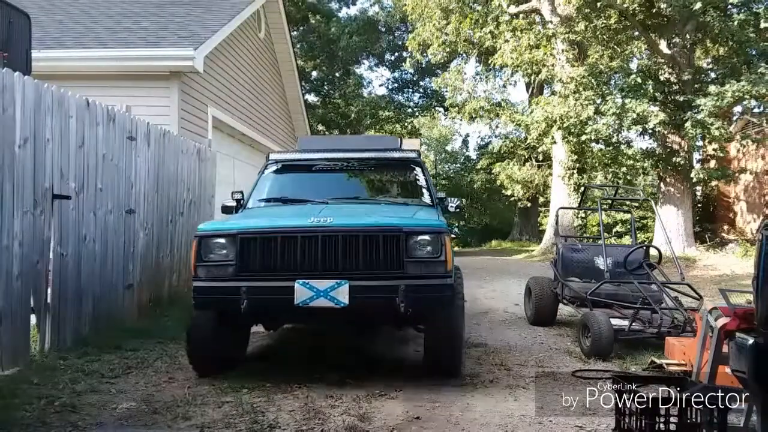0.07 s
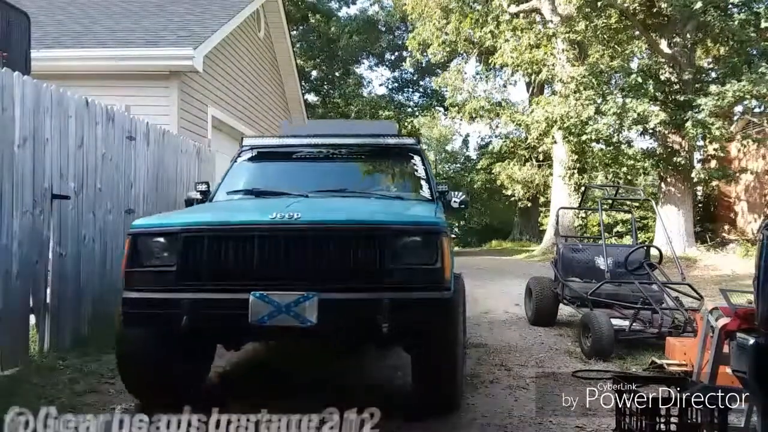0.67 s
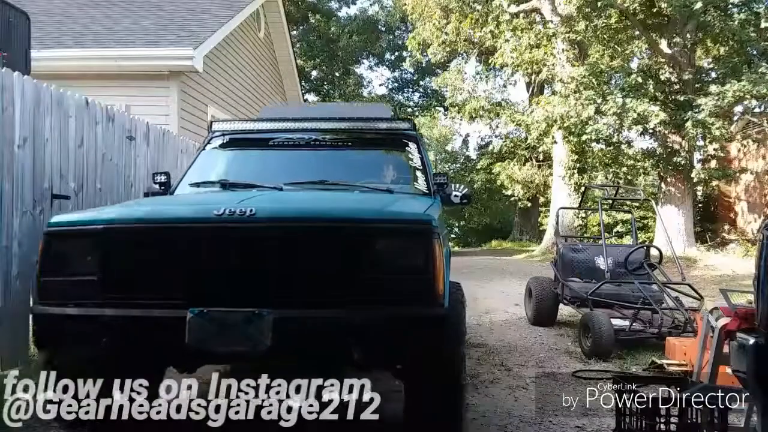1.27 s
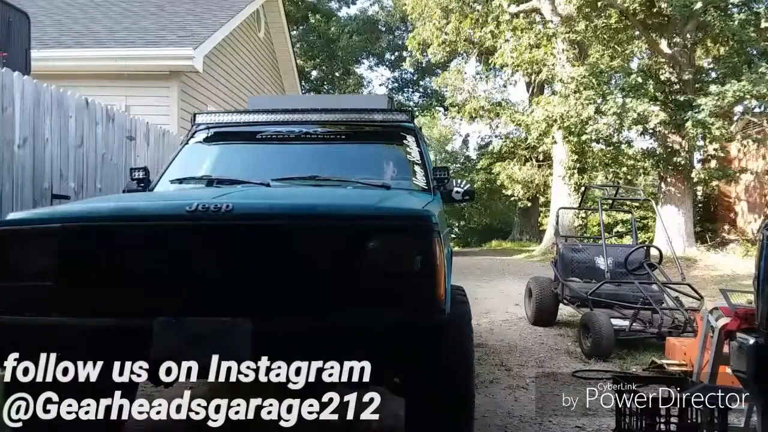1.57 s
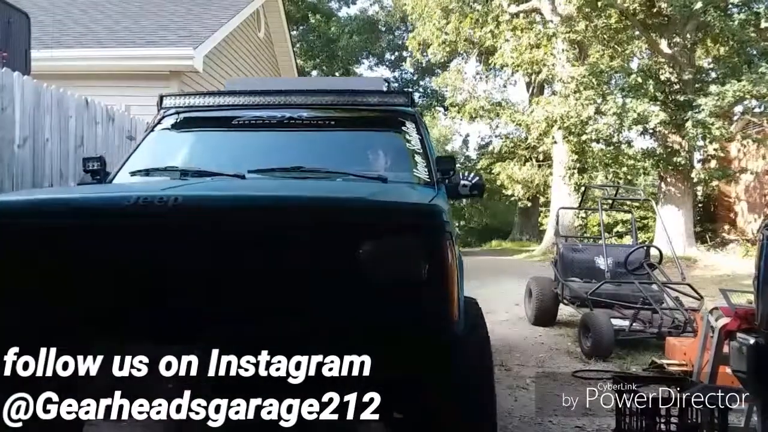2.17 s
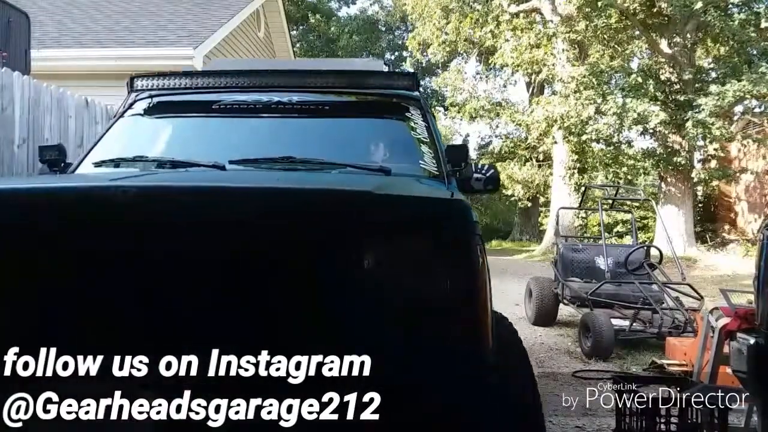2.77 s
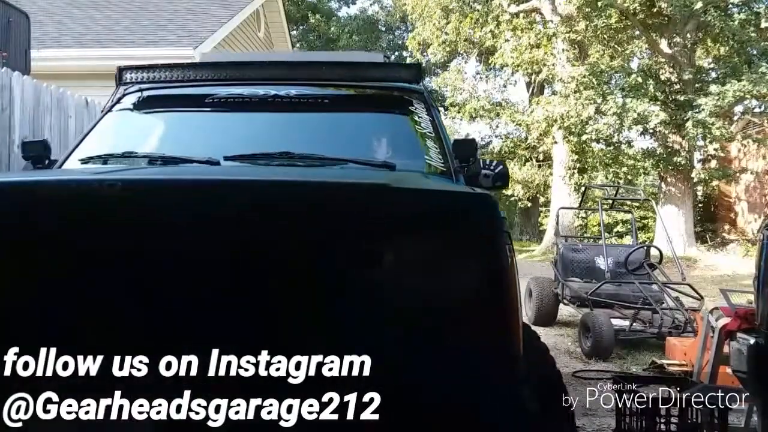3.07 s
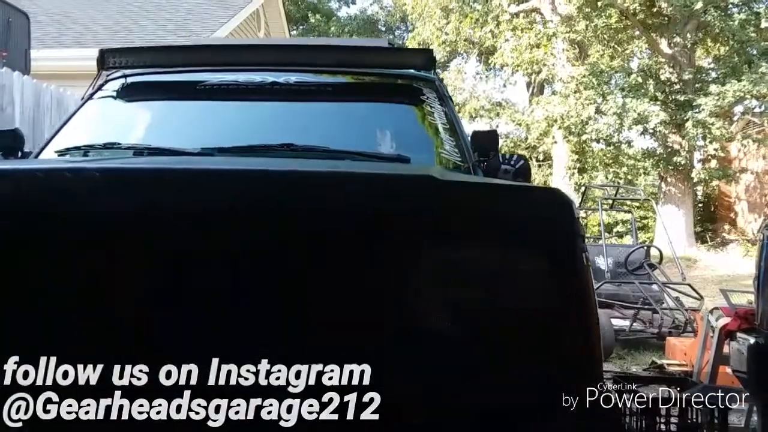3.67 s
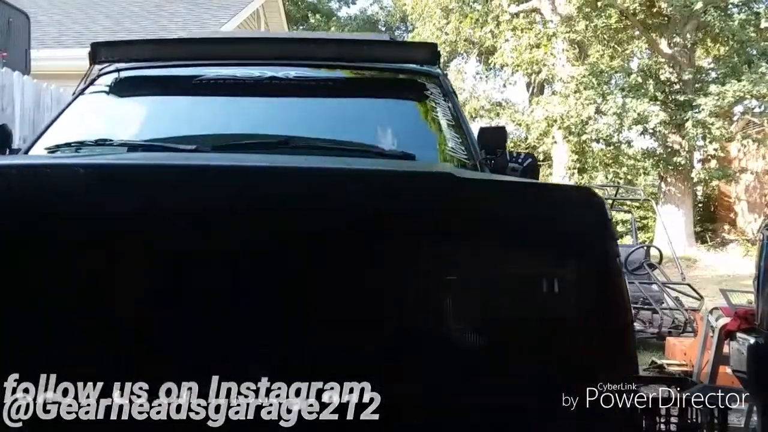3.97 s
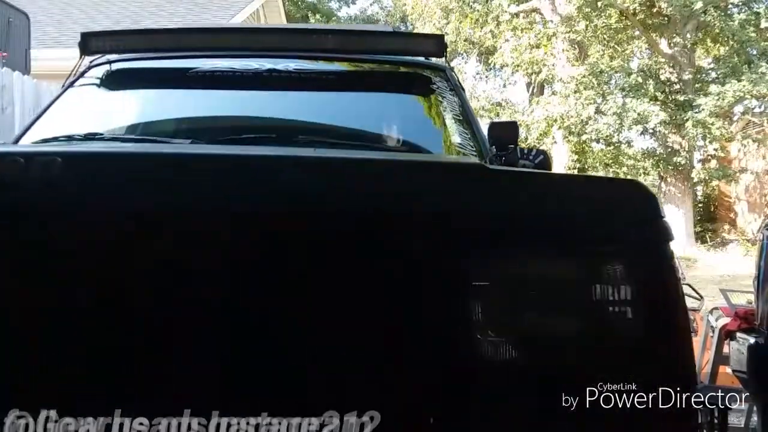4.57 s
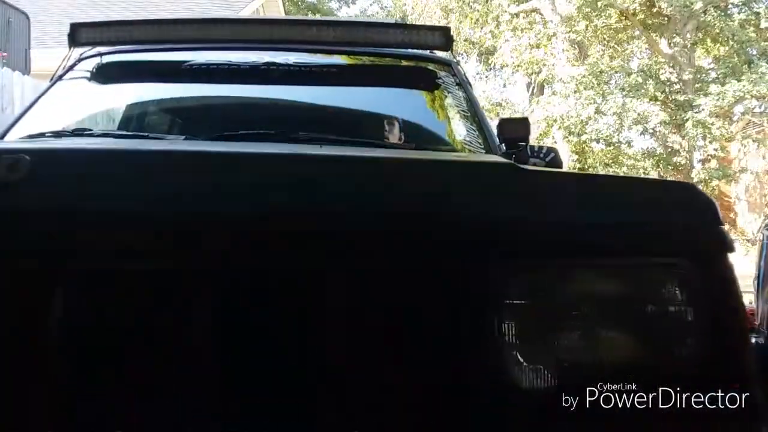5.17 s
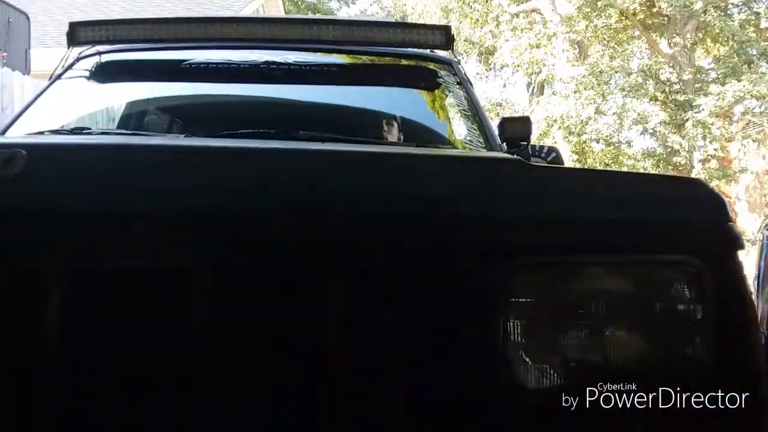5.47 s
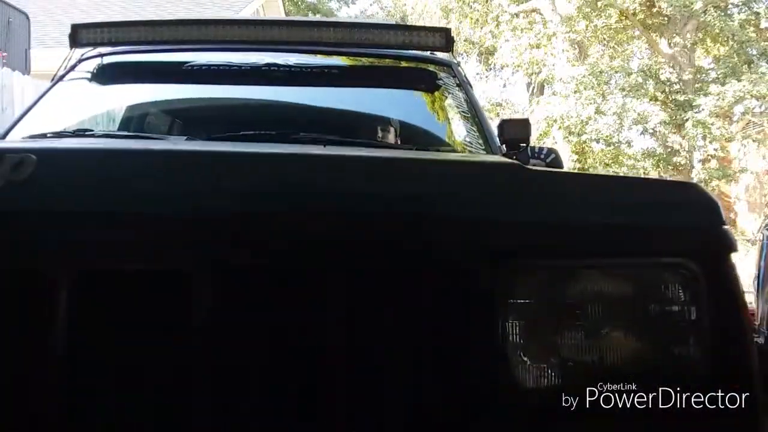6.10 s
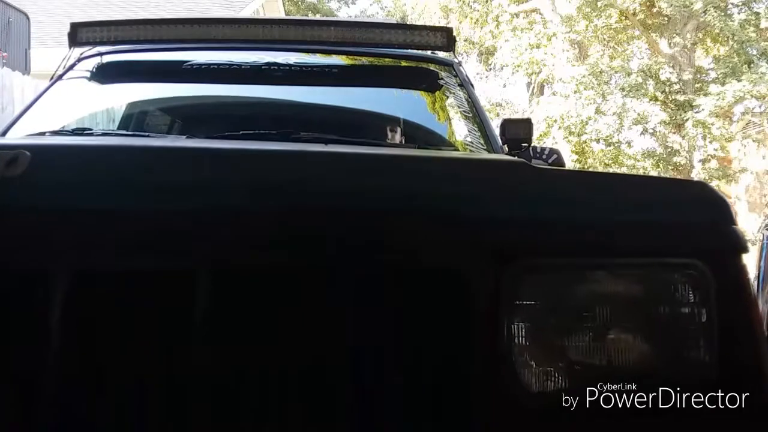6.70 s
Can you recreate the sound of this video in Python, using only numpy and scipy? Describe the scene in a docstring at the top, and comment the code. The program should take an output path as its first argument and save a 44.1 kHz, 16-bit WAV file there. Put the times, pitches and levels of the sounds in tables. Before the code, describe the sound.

An off-road car creeps up a gravel driveway toward the microphone, its engine throbbing low and uneven and growing steadily louder. Gravel crunches under the rumbling tyres and a few stones snap sharply. As it nears, valve ticking and fan rush come forward and the brakes rub grittily. It halts very close with two clunks, and the idle rises and keeps running.

```python
"""Off-road car on a gravel driveway.

A straight-six creeps up from a distance and halts just in front of a stereo microphone.
Uneven cylinders ring the exhaust; valves tick and the fan rushes behind the grille.
Gravel crunches and stones snap under the tyres, then the brakes rub as the car slows.
Close up, near the end, the drivetrain clunks and the idle rises as the load comes off."""
import sys
import numpy as np
from scipy import signal
from scipy.fft import rfft, irfft
from scipy.io import wavfile
from scipy.ndimage import uniform_filter1d

SR = 44100
rng = np.random.default_rng(int(sys.argv[2]) if len(sys.argv) > 2 else 0)


def dump(signal):
    """Clip the signal to [-1, 1] and save it as 16-bit WAV at the path in sys.argv[1]."""
    limited = np.clip(np.atleast_2d(signal).T, -1, 1)
    pcm = np.round(limited * 32767).astype(np.int16)
    wavfile.write(sys.argv[1], SR, pcm)


N = 301644
TIME = np.arange(N) / SR

# the six cylinders in firing order: strength/dB, change when far off/dB, lag/firing intervals
CYLINDER_PULSES = [(1.35, -3, .1), (2.07, -1, .084), (-2, -3, 0.054), (1.08, 3.5, .094), (-0.8, -3.5, 0.08),
                   (-.5, 3.5, 0.067)]


def undb(db):
    """Decibels to gain."""
    return 10 ** (np.asarray(db) / 20)


def unit(x):
    """Scale to rms 1."""
    return x / np.sqrt(np.mean(x ** 2))


def swell(s, width):
    """A smooth rise and fall around time s, 1 at the top."""
    return np.exp(-((TIME - s) / width) ** 2)


def ramp(start, length):
    """From 0 to 1 within a given length."""
    return np.clip((TIME - start) / length, 0, 1)


def walk(rate):
    """A smooth random drift with a spread near 1."""
    k = int(SR / rate)
    steps = np.repeat(rng.standard_normal(N // k + 1), k)
    return 1.27 * uniform_filter1d(uniform_filter1d(steps, k), k)[:N]


def colour(x, points):
    """Filter x by a curve of (f/Hz, level/dB) points; rms 1."""
    hz, db = np.transpose(points)
    f = np.maximum(np.arange(N // 2 + 1) * SR / N, 1)
    gain = undb(np.interp(np.log(f), np.log(hz), db)) * np.minimum(f / hz[0], 1) ** 2
    return unit(irfft(rfft(x) * gain, N))


def resonate(x, hz, width):
    """A resonance applied twice: steep skirts, gain 1 at the centre."""
    b, a = signal.iirpeak(hz, hz / width, fs=SR)
    return signal.lfilter(b, a, signal.lfilter(b, a, x))


def pulses(phase, marks, sizes):
    """One pulse wherever the phase passes a mark."""
    at = np.searchsorted(phase, marks)
    return np.bincount(np.minimum(at, N), sizes, N + 1)[:N]


def spread(pair, likeness, pan_db=0):
    """Mix two unrelated sounds into a stereo image; positive pan is to the left."""
    sides = np.array([[1], [-1]])
    mid, side = np.sqrt(1 + likeness) * pair[0], np.sqrt(1 - likeness) * pair[1]
    return (mid + side * sides) / np.sqrt(2) * undb(sides * pan_db / 2)


def burst(s, t60, tail_db, tail_t60):
    """A crack dying fast, followed by its scatter off fence and garage."""
    age = np.maximum(TIME - s, 0)
    span = (TIME >= s) & (age < .6)
    decay = undb(-60 * age[span] / t60) + undb(tail_db - 60 * age[span] / tail_t60)
    out = np.zeros((2, N))
    out[:, span] = rng.standard_normal((2, span.sum())) * decay
    return out


def rumble(far):
    """Low shudder of the body and the air it stirs, growing as the car nears."""
    air = colour(rng.standard_normal((2, N)), [(20, -9), (38, -8), (50, -14), (70, 1), (130, 7.5),
                 (200, -4.5), (280, 2), (360, -5.5), (700, -23.5), (2000, -70)])
    return spread(air, likeness=.88) * undb(-24.5 - 10.3 * far)


def tyres(level_db=-34, centre_s=2.1, width_s=1.0):
    """The knobbly tread rumbles as it rolls close, then slows."""
    tread = colour(rng.standard_normal((2, N)),
                   [(120, -18), (190, 2), (270, 10.5), (380, -3), (480, 6), (700, -31), (1500, -65)])
    return spread(tread, likeness=.9) * undb(level_db) * swell(centre_s, width_s)


def gravel(grains_per_s=260, size_db=3.5, roll_db=-46.5, roll_grind_db=-6, brake_s=2.1, slowing_s=2):
    """Small stones crunch under the tyres; on loose patches they rasp louder and grind together."""
    # loose patches: t/s, half width/s, crunch level/dB, grinding level/dB
    patches = [(.43, .025, -44, -49), (.55, .015, -38, -50), (.7, 0.013, -47, -48), (.84, 0.015, -40, -58),
               (1.15, .022, -35, -53), (1.555, 0.032, -30, -48), (1.785, .032, -32.5, -48),
               (1.925, 0.047, -33.5, -53), (2.57, 0.092, -38, -34), (2.9, 0.057, -38, -32),
               (3.07, 0.15, -32.5, -27), (3.38, 0.11, -37.5, -37)]
    t = TIME[:SR // 30]
    hits = rng.random((2, N)) < grains_per_s / SR
    sizes = undb(size_db * np.minimum(rng.exponential(size=(2, N)), 2.5))
    grain = rng.standard_normal((2, len(t))) * undb(-60 * t / 0.047)
    grains = signal.oaconvolve(hits * sizes, grain, axes=1)[:, :N]
    crunch = colour(grains, [(900, -16), (1250, -15), (1680, 10), (2200, -9), (2600, 1), (2950, 5),
                             (3600, -22), (5000, -41), (14000, -42)])
    grind = colour(grains, [(300, -8), (520, -11), (790, 10), (1100, 2), (2000, -35.5)])
    rolling = undb(roll_db) * (1 - ramp(brake_s, slowing_s)) * (crunch + undb(roll_grind_db) * grind)
    loose = sum((undb(crunch_db) * crunch + undb(grind_db) * grind) * swell(s, width)
                for s, width, crunch_db, grind_db in patches)
    return spread(rolling + loose, likeness=.1, pan_db=2)


def snaps(ring_db=5, ring_width_hz=900):
    """Stones pinched by a tyre crack brightly, each with a brief ring of its own."""
    # pinched stones: t/s, level/dB, t60/s, ring f/Hz
    stones = [(2.143, -15, 0.0065, 4630), (2.1472, -20, 0.008, 7400), (2.1695, -26.5, .035, 4500),
              (2.174, -23, .03, 7240), (2.3055, -33, 0.044, 4600), (2.4407, -28.5, 0.098, 6000),
              (2.642, -27.5, .023, 12500)]
    # spectrum of a snap: f/Hz, level/dB
    snap_spectrum = [(1500, 3), (3500, 9.5), (4700, 8), (6000, 4), (8000, 4.5), (10000, -1), (13000, 3),
                     (15500, 7)]
    cracks = 0
    for s, db, t60, hz in stones:
        crack = undb(db) * burst(s, t60, tail_db=-17, tail_t60=0.38) + 1e-18
        cracks = cracks + crack + undb(ring_db) * resonate(crack, hz, ring_width_hz)
    return spread(colour(cracks, snap_spectrum) * cracks.std(), likeness=.2, pan_db=1)


def knocks():
    """Dull blows; each struck part rings with dense modes inside its own band."""
    # blows of stones and body: t/s, level/dB, lowest f/Hz, highest f/Hz, t60/s
    blows = [(.40, -32, 680, 827, 0.32), (1.6, -31, 1000, 1510, .15), (2.2288, -9, 740, 1550, 0.011),
             (2.233, -21.5, 550, 1350, 0.16), (2.438, -13.5, 168, 346, 0.13),
             (2.443, -13.5, 480, 855, 0.15)]
    out = 0
    for s, db, low, high, t60 in blows:
        band = signal.butter(4, [low, high], "band", fs=SR, output="sos")
        blow = signal.sosfilt(band, burst(s, t60, tail_db=-10.5, tail_t60=3.5 * t60) + 1e-18)
        out = out + undb(db) * np.sqrt(SR / 2 / (high - low)) * blow
    return spread(out, likeness=.55)


def brakes(chatter_db=3, chatter_hz=160):
    """The pads rub in quick, gritty grabs and ring the discs."""
    # rubs of the pads: t/s, half width/s, level/dB
    rubs = [(3.738, 0.0059, -26.5), (3.845, 0.024, -27), (3.95, 0.11, -29), (4.28, 0.12, -26.5),
            (4.68, 0.21, -30.5), (5.25, .1, -31.5), (5.44, .024, -25), (5.85, 0.05, -29),
            (6.39, 0.028, -26)]
    # disc resonances: f/Hz, width/Hz, level/dB
    disc_modes = [(1000, 280, -3.5), (1297, 330, 6), (1517, 210, -3)]
    friction = rng.standard_normal((2, N)) * undb(chatter_db * walk(chatter_hz))
    ring = unit(sum(undb(db) * resonate(friction, hz, width) for hz, width, db in disc_modes))
    return spread(ring, likeness=-.1) * sum(undb(db) * swell(s, width) for s, width, db in rubs)


def clunks(t60=0.26, attack_s=0.011):
    """The drivetrain takes up its slack at the halt; each blow builds briefly as parts scrape home."""
    # drivetrain blows: t/s, level/dB
    impacts = [(6.108, -20), (6.21, -20.5)]
    # spectrum of a clunk: f/Hz, level/dB
    clunk_spectrum = [(500, -6), (750, -3), (1000, -7), (1350, 3.5), (2000, -8), (3200, -8), (4500, -33),
                      (12000, -51)]
    blows = sum(undb(db) * burst(s, t60, tail_db=-15, tail_t60=0.57) * ramp(s, attack_s)
                for s, db in impacts)
    return spread(colour(blows, clunk_spectrum) * blows.std(), likeness=.4, pan_db=1)


def valve_train(phase, count=12, uneven_db=3.5, scatter_db=4.5, t60=0.066):
    """Twelve valves close once a cycle, each with a short ring of its own."""
    cycle, out = phase / len(CYLINDER_PULSES), 0
    n, t = np.arange(int(cycle[-1]) + 1), TIME[:SR // 20]
    for k in range(count):
        valve_db = uneven_db * np.cos(2 * np.pi * (k / count - .6)) / 2
        sizes = undb(valve_db + scatter_db * rng.standard_normal(len(n)))
        ring = rng.standard_normal((2, len(t))) * undb(-60 * t / t60)
        closings = pulses(cycle, n + (k + rng.uniform(0, .4)) / count, sizes)
        out = out + signal.oaconvolve(closings[None], ring, axes=1)
    return unit(out[:, :N])


def engine_bay(phase, far, rise):
    """Valve ticks and rushing air, coloured by block, valve cover, panels and a fan left of centre."""
    # spectra of the block, the valve cover, the fan and its hiss: f/Hz, level/dB
    block_spectrum = [(150, 8), (220, -15), (330, -7.5), (480, 3.5), (570, 0), (780, 0), (900, -1.5),
                      (1030, -4.5), (1200, -3.5), (2000, -21), (4000, -36.5)]
    cover_spectrum = [(800, -18), (1130, -4), (1270, 2), (1480, 3), (1750, 4), (2000, 0.5), (3000, -9),
                      (6000, -45)]
    fan_spectrum = [(700, -10), (1500, 0), (2200, -1), (2800, -3), (3350, -4.5), (4200, -8), (5300, -16),
                    (7000, -20.5), (12000, -45)]
    hiss_spectrum = [(3000, -24), (5500, -3.5), (7000, 1), (8300, -1.5), (9600, -5), (12000, -0.5),
                     (14000, -2.5), (15500, -6)]
    # resonances of thin metal panels: f/Hz, width/Hz, level/dB
    panel_modes = [(650.3, 11, 7), (742, 13.7, 5), (806, 16, -3), (850, 15, 3), (870, 21, -3),
                   (984, 15.4, 7.5), (1048, 51, 3.5), (1254, 40, 3.5), (1314, 65, -0.5), (1392, 210, -3.5),
                   (1479, 34, 2.5), (1510, 41, 3.5), (1642, 29, 3), (1780, 70, -8), (2200, 30, -8),
                   (2844, 21, -4.5)]
    ticks = valve_train(phase)

    def drive(tick_db, flicker_db):
        """Air and ticks, wavering a little."""
        return (rng.standard_normal((2, N)) + undb(tick_db) * ticks) * undb(flicker_db * walk(16))

    def gain(near_db, far_db, rise_db):
        """A part grows as the car nears and changes as the idle rises."""
        return undb(near_db + far_db * far + rise_db * rise)

    block = colour(drive(tick_db=-11.5, flicker_db=1.3), block_spectrum) * gain(-28.5, -9.5, 1)
    cover = colour(drive(tick_db=-4, flicker_db=1.5), cover_spectrum) * gain(-31.5, -16.5, -18)
    shake = drive(tick_db=2, flicker_db=3.5)
    rattle = sum(undb(db) * resonate(shake, hz, width) for hz, width, db in panel_modes)
    panels = unit(rattle) * gain(-25, -30, -8)
    fan = colour(drive(tick_db=-6, flicker_db=0.78), fan_spectrum) * gain(-33, -7.5, 2)
    hiss = colour(drive(tick_db=-14, flicker_db=1.44), hiss_spectrum) * gain(-43.5, -7.5, 2)
    metal = spread(block, likeness=.62, pan_db=.5) + spread(cover + panels, likeness=-.2)
    air = spread(fan, likeness=0, pan_db=4) + spread(hiss, likeness=-.1, pan_db=-.8)
    return metal + air


def cut_band(x, null_hz=194, width_hz=18):
    """One narrow band of the exhaust sound is cut away."""
    return signal.lfilter(*signal.iirnotch(null_hz, null_hz / width_hz, fs=SR), x)


def exhaust(phase, hz, far, rise, scatter_db=0.2, jitter=0.0023, gas_db=-30, waver_db=1.7):
    """Each cylinder sends its pulse down the pipe; turbulent gas roughens the tone, overtones waver."""
    # pipe and body modes: f/Hz, width/Hz, close level/dB, change far off/dB, change at raised idle/dB
    pipe_modes = [(82.55, 13.4, -6.5, -26.5, 7), (117.1, 17.4, -8, -9, 2), (144.45, 11.3, -3.5, -5, -2.5),
                  (164.55, 7.4, -13, 6, 1.3), (230.1, 11.7, -33.5, 0.5, -14), (269.6, 17.6, -21, -13, 4.5),
                  (288.6, 10.6, -39.5, 12, -11), (390.3, 21.5, -24, -34.5, 4), (485.4, 30, -40, 1, -10)]
    # the deepest boom is stronger at the start, then dips three times: t/s, half width/s, change/dB
    boom_changes = [(0, 0.3, 10), (1.35, .3, -8), (1.75, 0.29, -8), (2.92, 0.52, -4)]
    n = np.arange(int(phase[-1]) + 1)
    db, far_change_db, lag = np.array(CYLINDER_PULSES)[n % len(CYLINDER_PULSES)].T
    db = db + far_change_db * np.interp(n, phase, far)
    chance = rng.standard_normal((len(n), 2)).T
    firings = pulses(phase, n + lag + jitter * chance[0], undb(db + scatter_db * chance[1]))
    firings = firings * SR / hz / 2
    flow = undb(gas_db) * firings.std() * rng.standard_normal(N) - firings
    tones = [resonate(flow, f, width) * undb(near_db + far * far_db + rise * rise_db)
             for f, width, near_db, far_db, rise_db in pipe_modes]
    boom = tones[0] * undb(sum(change_db * swell(s, width) for s, width, change_db in boom_changes))
    throb = sum(tones[1:4])
    growl_db = 7.5 * swell(6.53, 0.028)  # the freed engine speeds up
    overtones = sum(tones[4:]) * undb(waver_db * walk(14) + growl_db)
    fade_in_db = -2.5 * (1 - ramp(0, 0.36))  # the exhaust fades in over the first third of a second
    return (boom + throb + overtones) * undb(fade_in_db)


def scene(release_s=6.363, releasing_s=0.27):
    """The crank, hunting a little, drives exhaust and valves as the car rolls up to the microphone."""
    # engine speed: t/s, firing rate/Hz
    firing_rate = [(0.0, 38.9), (0.35, 40.11), (0.53, 39.35), (0.88, 39.66), (1.23, 38.22), (1.58, 38.74),
                   (1.75, 38.08), (2.28, 39.24), (2.81, 37.55), (3.51, 38.73), (4.21, 38.14), (4.56, 38.92),
                   (5.09, 38.23), (5.61, 38.26), (5.96, 37.88), (6.31, 39.51), (6.49, 43.53), (6.84, 44.4)]
    # the approach: t/s, distance (1 far off, 0 at the microphone)
    approach = [(0, 0.77), (1.2, 0.61), (1.9, 0.36), (3, 0.23), (4.5, 0.19), (5.7, 0.13)]
    hz = np.interp(TIME, *np.transpose(firing_rate))
    far = np.interp(TIME, *np.transpose(approach))
    rise = ramp(release_s, releasing_s)  # the load comes off the engine
    phase = np.cumsum(hz) / SR  # counts firings
    # the pipe lies a little to the right, more so close up, so its sound reaches the left later
    right = cut_band(exhaust(phase, hz, far, rise))
    left = np.interp(TIME - .00018 * (1 - .7 * far), TIME, right)
    engine = np.array([left, right]) + engine_bay(phase, far, rise) + rumble(far)
    return engine + tyres() + gravel() + snaps() + knocks() + brakes() + clunks()


def record(dry, ceiling=.95, top_hz=15100):
    """The recorder rounds the very highest peaks and cuts the top."""
    rounded = dry / (1 + np.abs(dry / ceiling) ** 10) ** .1
    return signal.sosfilt(signal.ellip(8, .2, 70, top_hz, fs=SR, output="sos"), rounded)


dry = scene()
out = record(dry)
dump(out)
```